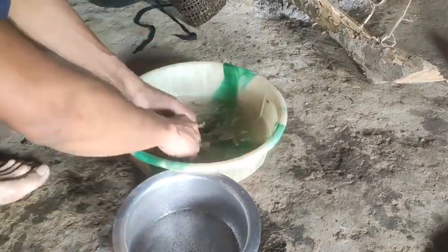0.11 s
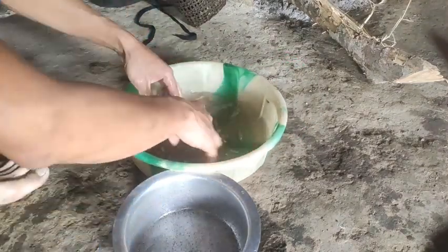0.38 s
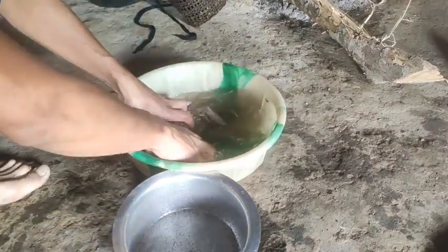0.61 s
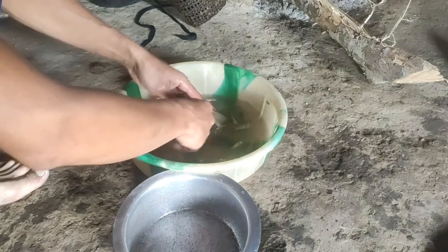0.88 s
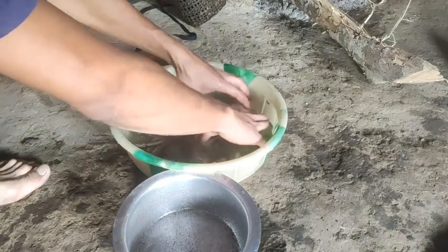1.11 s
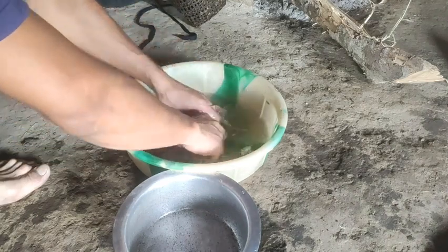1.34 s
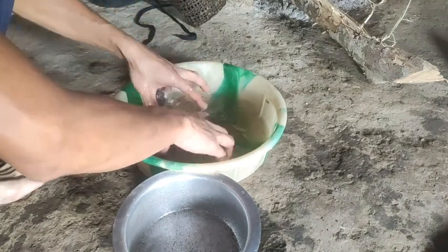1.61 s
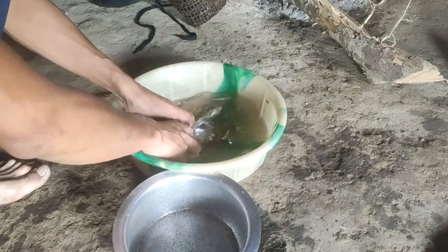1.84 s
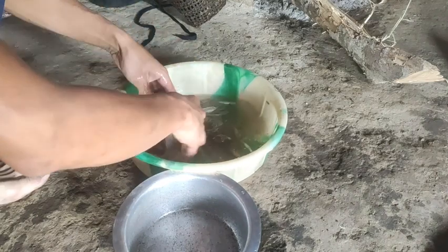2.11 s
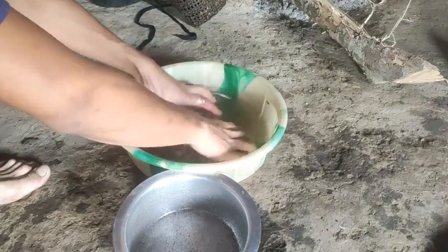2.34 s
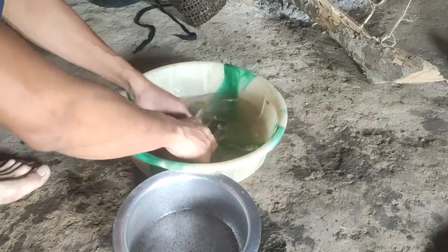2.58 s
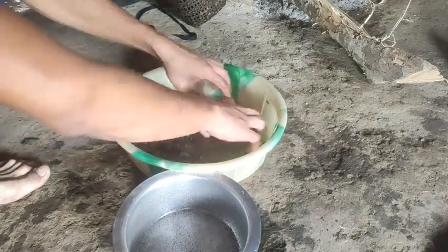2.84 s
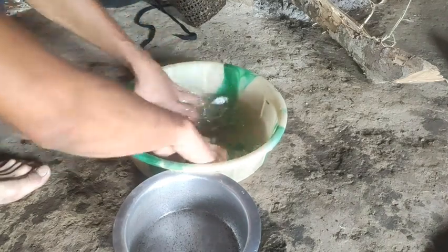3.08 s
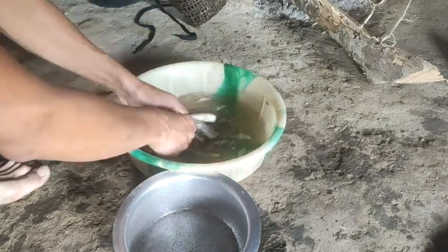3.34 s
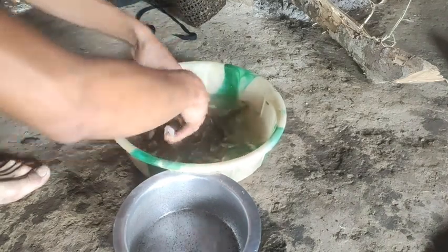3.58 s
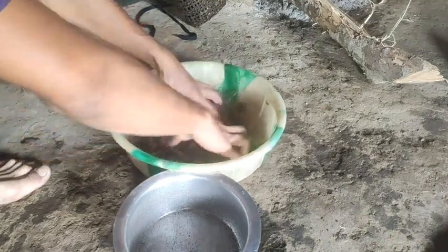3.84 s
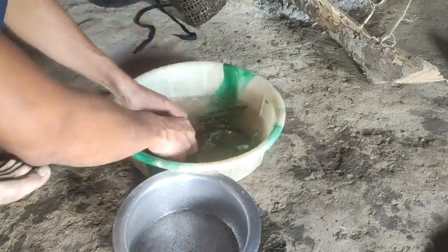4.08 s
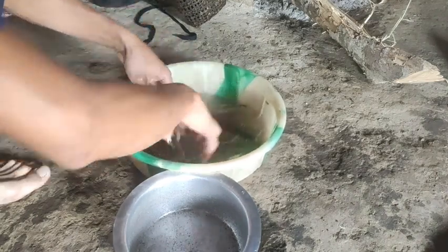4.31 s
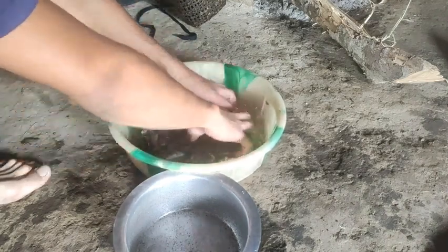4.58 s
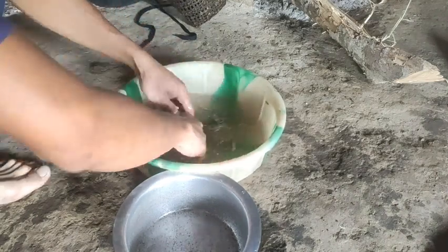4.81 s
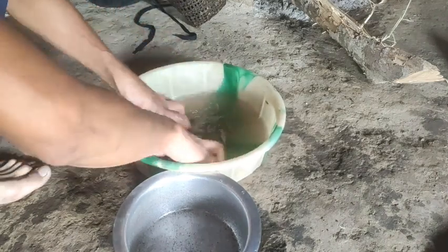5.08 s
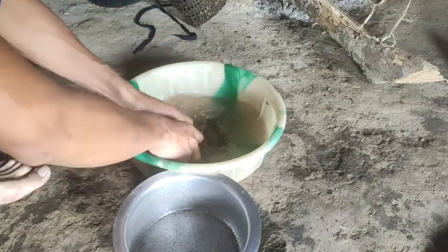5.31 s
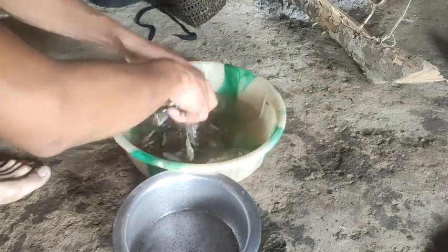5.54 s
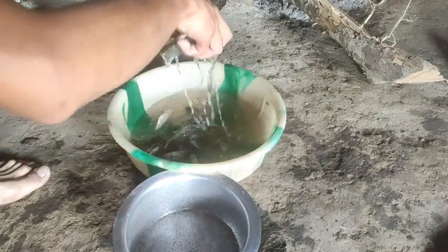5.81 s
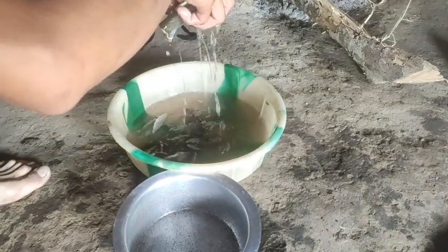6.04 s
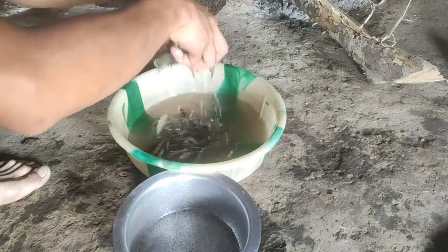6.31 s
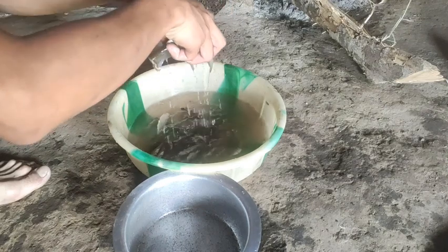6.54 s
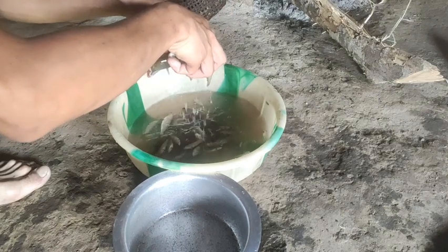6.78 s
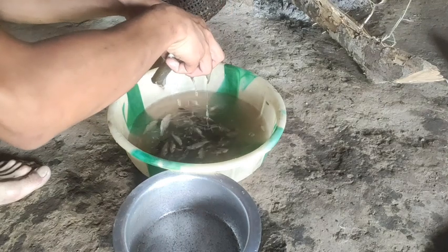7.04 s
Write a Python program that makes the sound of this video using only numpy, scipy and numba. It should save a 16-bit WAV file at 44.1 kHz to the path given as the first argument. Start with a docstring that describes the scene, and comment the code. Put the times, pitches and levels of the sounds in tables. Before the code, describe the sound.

Close watery swishing with bubbly gulps and bright spray in a plastic basin, ending in lighter droplets as a wet handful is raised outdoors.

```python
"""On a concrete yard, hands slosh small fish round a plastic basin of water, then lift them out to drip.
Trapped air gulps, plops and sings as fading sines; broken surface sprays as many tiny rings and noise.
The basin wall rings through resonant filters and thumps as low noise; reflections add a short tail.
The yard lies below as faint low rumble and hiss, made of noise bands.
A two-port phone microphone listens from above."""
import sys
import numpy as np
from scipy import signal
from scipy.io import wavfile
from scipy.ndimage import map_coordinates
from numba import njit

SR = 44100
rng = np.random.default_rng(int(sys.argv[2]) if len(sys.argv) > 2 else 0)


def to_linear_factor(level_db):
    """Convert decibel levels (scalar or array-like) to linear amplitude factors."""
    exponent = np.asarray(level_db, float) / 20
    return 10 ** exponent


def file_out(sig):
    """Save sig as 16-bit WAV at sys.argv[1]."""
    # one column per channel
    cols = np.atleast_2d(sig).T
    # limit, then scale
    lim = np.clip(cols, -1, 1)
    pcm = np.round(lim * 32767).astype(np.int16)
    wavfile.write(sys.argv[1], SR, pcm)


N = 315756   # length in samples
LEFT_LAG_S = 4.5e-5   # usual delay at the left port


def rms_one(x):
    """Scales a sound to an average strength (rms) of 1."""
    return x / np.sqrt(np.mean(x ** 2) + 1e-20)


def in_time(rows):
    """Turns each column after the time column into a curve with one value per sample."""
    s, *columns = np.transpose(rows)
    return [np.interp(np.arange(N) / SR, s, column) for column in columns]


def at_hz(points, hz):
    """Reads a curve over frequency, on a log frequency axis."""
    points_hz, values = np.transpose(points)
    return np.interp(np.log(hz), np.log(points_hz), values)


def drift(rate_hz):
    """Slow random wandering with rms 1, worked out at every 40th sample and filled in between."""
    r = np.exp(-80 * np.pi * rate_hz / SR)
    noise = rng.standard_normal(N // 40 + 2002)
    slow = signal.lfilter([1], [1, -2 * r, r * r], noise)[2000:]   # skip the filter's start
    return np.interp(np.arange(N) / 40, np.arange(len(slow)), rms_one(slow))


def spurts(rate_hz, fade_s):
    """Random jumps that come at once and die away, scaled to rms 1 and then capped at 2.5."""
    jumps = rng.exponential(1, N) * (rng.random(N) < rate_hz / SR)
    r = np.exp(-1 / (fade_s * SR))
    x = signal.lfilter([1], [1, -r], jumps + 1e-18)
    return np.minimum(rms_one(x - x.mean()), 2.5)


def band(x, low_hz, high_hz):
    """Keeps one frequency band, with its upper edge held to a safe limit."""
    edges = [low_hz, min(high_hz, .45 * SR)]
    return signal.sosfilt(signal.butter(2, edges, "band", fs=SR, output="sos"), x)


@njit
def add_rings(out, start, gains, hz, t60, rise, attack):
    """Each bubble is a dying sine; a positive rise makes its pitch climb as it nears the surface."""
    for k in range(len(hz)):
        for side in range(2):
            first = int(start[side, k]) + 1
            for i in range(first, min(first + int(.7 * t60[k] * SR), out.shape[1])):
                t = (i - start[side, k]) / SR
                turn = hz[k] * t * (1 + rise[k] * t / t60[k])
                fade = np.exp(-np.log(1000) * t / t60[k])   # 60 dB down at t60
                swell = min(t * hz[k] / attack, 1)   # attack is in cycles
                out[side, i] += gains[side, k] * fade * swell * np.sin(2 * np.pi * turn)


def bubbles(s, level_db, hz, t60, pan_db, rise, lag_s, attack):
    """Places bubbles between the two ports: pan_db is left over right, lag_s the delay at the left."""
    out = np.zeros((2, N))
    t60, pan_db, rise, lag_s = [x + 0 * s for x in (t60, pan_db, rise, lag_s)]   # one value per bubble
    start = np.array([s + lag_s / 2, s - lag_s / 2]) * SR
    gains = to_linear_factor(level_db + np.array([pan_db / 2, -pan_db / 2]))
    add_rings(out, np.maximum(start, 0), gains, hz, t60, rise, attack)
    return out


def yard():
    """Narrow bands of stereo noise, each wandering in level, alike at the ports mainly in the bass."""
    # Relative strength of the yard noise: f/Hz, level/dB
    yard_spectrum = [(15, -29), (25, 4), (76, -6), (127, 2), (190, -16), (290, 2.5), (365, -35), (520, -9),
                     (1330, -23), (8300, -20), (11500, -19.5), (14800, -21), (16000, 10)]
    # How alike the ports hear it: f/Hz, likeness (1 = the same, 0 = unrelated)
    port_likeness = [(60, 0.45), (130, 0.98), (300, 0.83), (640, 0), (15000, 0.0091)]
    out, edges = 0, 22 * 2 ** np.arange(0, 9.7, .4)
    white = rng.standard_normal((2, 2, N))
    for k, (low, high) in enumerate(zip(edges, edges[1:])):
        mid, side = band(white[k % 2], low, high)
        hz = np.sqrt(low * high)
        alike = np.clip(at_hz(port_likeness, hz), 0, 1)
        gain = to_linear_factor(at_hz(yard_spectrum, hz) + 3.5 * drift(3.9))
        stereo = np.sqrt(1 + alike) * mid + np.sqrt(1 - alike) * side * [[1], [-1]]
        out = out + gain * stereo
    level_db, left_db = -61, 0.9   # left_db: left over right
    return to_linear_factor(level_db + left_db * np.array([[.5], [-.5]])) * rms_one(out)


def stirring():
    """Gurgle and spray levels in dB: each slosh swells, holds and fades on top of the lapping."""
    # Sloshes of the hands, then of water falling back from the lifted fish, before layer trims:
    # t/s at full level, hold/s, gurgle level/dB, spray level/dB
    slosh_table = [(0.0, 0.062, -52.5, -54.5), (0.105, 0.17, -51.5, -53), (0.515, 0.02, -57, -47),
                   (0.615, 0.092, -53, -52.5), (0.731, 0.079, -49, -46), (1.014, 0.062, -58, -52.5),
                   (1.097, 0.046, -52, -41.5), (1.191, 0.025, -47, -52), (1.248, 0.032, -50.5, -48),
                   (1.328, 0.092, -50, -44.5), (1.625, 0.029, -53.5, -47), (1.754, 0.055, -55.5, -50),
                   (1.85, 0.11, -49, -48.5), (1.97, 0.076, -58, -53), (2.177, 0.04, -52, -50),
                   (2.295, 0.012, -60.5, -44.5), (2.479, 0.072, -48.5, -49.5), (2.589, 0.054, -54, -51),
                   (2.693, 0.029, -53.5, -44), (2.823, 0.018, -55.5, -51.5), (2.878, 0.024, -79, -48),
                   (2.96, 0.0074, -53, -53.5), (3.063, 0.12, -48.5, -49.5), (3.201, 0.17, -56, -51.5),
                   (3.466, 0.033, -57.5, -54.5), (3.583, 0.022, -77, -48), (3.681, 0.089, -54.5, -44),
                   (3.802, 0.039, -50, -58), (3.913, 0.085, -51, -52.5), (3.986, 0.081, -53.5, -55.5),
                   (4.134, 0.028, -56, -54), (4.21, 0.042, -49, -50.5), (4.4, 0.067, -58.5, -46),
                   (4.551, 0.23, -49.5, -50), (4.881, 0.017, -58.5, -52.5), (4.991, 0.061, -60, -53),
                   (5.109, 0.18, -48, -51), (5.386, 0.01, -50.5, -56.5), (5.767, 0.0075, -55.5, -72),
                   (5.807, 0.042, -68, -50.5), (5.89, 0.047, -58, -56.5), (5.976, 0.011, -54, -51),
                   (6.077, 0.11, -55.5, -56.5), (6.213, 0.064, -54, -49.5), (6.395, 0.036, -54, -50),
                   (6.653, 0.0097, -59, -56)]
    # Lapping that goes on between the sloshes, before layer trims: t/s, gurgle level/dB, spray level/dB
    lapping_table = [(0.0, -68, -56.5), (0.45, -62, -55), (0.95, -65, -60.5), (1.5, -61, -54),
                     (2.13, -64.5, -58.5), (2.8, -60, -59.5), (3.5, -61, -60.5), (4.3, -65.5, -61.5),
                     (5.05, -63, -61), (5.5, -61.5, -61), (5.63, -74.5, -60.5), (6.5, -73.5, -59.5),
                     (6.72, -76, -67.5), (7.16, -83, -79)]
    # Sloshes that start with a slap: t/s
    slap_times = (1.099, 2.485, 2.178, 2.698, 3.682, 4.553, 5.109)
    lift_s = 5.6   # once the fish are lifted, water lands more abruptly
    swell_db_per_s, fall_swell_db_per_s, slap_swell_db_per_s = 412, 898, 4000
    fades_db_per_s = (344, 274)   # gurgle, spray

    start, hold, *peaks_db = np.transpose(slosh_table)[:, :, None]
    t = np.arange(0, N + 64, 64) / SR
    early = np.maximum(start - t, 0)
    late = np.maximum(t - start - hold, 0)
    swell = np.where(start < lift_s, swell_db_per_s, fall_swell_db_per_s)
    sudden = np.abs(start - np.array(slap_times)).min(axis=1, keepdims=True) < .008
    swell = np.where(sudden, slap_swell_db_per_s, swell)
    levels = []
    for peak_db, fade, calm_db in zip(peaks_db, fades_db_per_s, in_time(lapping_table)):
        power = np.sum(to_linear_factor(peak_db - swell * early - fade * late) ** 2, axis=0)
        power = np.interp(np.arange(N) / SR, t, power)
        levels.append(10 * np.log10(power + to_linear_factor(calm_db) ** 2))
    return levels


def swarm(count, spectrum, level_db, cycles, uneven_db, clump_db, patch_db, spread_s, rise):
    """Many chance bubbles all over the surface, in clumps (clump_db) that favour some sizes (patch_db)."""
    when, pitch, size, place, climb, life = rng.random((count, 6)).T
    low, high = np.log(spectrum[1][0]), np.log(spectrum[-2][0])   # the end rows lie outside the range
    hz = np.exp(low + pitch * (high - low))
    at = (when * (N - 1)).astype(int)
    by_size = np.array([drift(35)[at] for size_class in range(5)])
    patches = map_coordinates(by_size, [4 * pitch, np.arange(count)], order=1)
    clumps = clump_db * spurts(rate_hz=45, fade_s=0.0041)[at] + patch_db * patches
    # 10 log10(hz) makes up for the shorter ring of high bubbles; uneven_db lets a few stand out.
    size_db = at_hz(spectrum, hz) + 10 * np.log10(hz) + clumps - uneven_db * np.log(size + 0.084)
    t60 = cycles * 2 ** (1.93 * (life - .4)) / hz
    pan_db = 2.44 + 5 * (place - .5)
    lag_s = LEFT_LAG_S + spread_s * (place - .5)
    out = bubbles(when * N / SR, size_db, hz, t60, pan_db, rise * climb, lag_s, attack=0.42)
    return to_linear_factor(level_db) * rms_one(out)


def gurgle(gurgle_db):
    """Trapped air gulps as a clumpy swarm of mostly low, climbing bubbles."""
    # Relative bubble strength by pitch: f/Hz, level/dB
    gurgle_spectrum = [(300, -30), (430, -16), (620, -8), (900, -6.5), (1300, 0.5), (2200, -0.5),
                       (3400, -9), (4000, -30)]
    return swarm(count=9000, spectrum=gurgle_spectrum, level_db=gurgle_db, cycles=26, uneven_db=2.4,
                 clump_db=1.6, patch_db=2.0, spread_s=0.00036, rise=0.6)


def plinks(gurgle_db, spray_db):
    """Lone bubbles, fewer and evenly scattered, ring for more cycles."""
    # Relative bubble strength by pitch: f/Hz, level/dB
    plink_spectrum = [(500, -30), (700, -5), (1400, 0), (3200, -4), (8000, -12), (9000, -40)]
    return swarm(count=1000, spectrum=plink_spectrum, level_db=(gurgle_db + spray_db) / 2 - 5,
                 cycles=43.6, uneven_db=3.5, clump_db=0, patch_db=0, spread_s=.0003, rise=.35)


def fizz(spray_db):
    """Broken surface sprays and fizzes as a dense swarm of tiny high rings."""
    # Relative fizz strength by pitch: f/Hz, level/dB
    fizz_spectrum = [(1470, -30), (2500, -14), (3360, -11.5), (5440, -12), (8330, -8.5), (12000, -15),
                     (15200, -10), (16000, -26)]
    return swarm(count=90000, spectrum=fizz_spectrum, level_db=spray_db + 1.5, cycles=34, uneven_db=1.4,
                 clump_db=1.34, patch_db=3.0, spread_s=0.00049, rise=0.061)


def wall_push(push_db):
    """Heaving water thumps dully on the wall: lumpy low noise, mostly shared by both ports."""
    lumps = to_linear_factor(5.5 * drift(45))
    noise = rng.standard_normal(N) + 0.18 * rng.standard_normal((2, N))
    return to_linear_factor(push_db) * rms_one(band(noise * lumps, 59, 430))


def basin(water):
    """The plastic wall rings in sympathy with the water: one resonant filter per way it can ring."""
    # Ways the wall rings: f/Hz, gain/dB, ring time to fall 60 dB/s
    wall_modes = [(617.6, 3, 0.076), (1014, 0, 0.23)]
    out = np.zeros((2, N))
    for hz, gain_db, t60 in wall_modes:
        r = to_linear_factor(-60 / (t60 * SR))
        w = 2 * np.pi * hz / SR
        push = [(1 - r * r) / 2, 0, (r * r - 1) / 2]
        out += to_linear_factor(gain_db) * signal.lfilter(push, [1, -2 * r * np.cos(w), r * r], water)
    return out


def reflections(x, t60):
    """Bowl, arms and ground scatter a short tail of fading noise, different at each port."""
    t = np.arange(1500) / SR
    tail = rng.standard_normal((2, len(t))) * to_linear_factor(-60 * t / t60) * (t > .0004)
    tail = band(tail, 1350, 7800)
    tail = tail / np.sqrt(np.sum(tail ** 2, axis=1, keepdims=True))
    return signal.fftconvolve(x, tail, axes=1)[:, :N]


def splashes():
    """A sheet of water tears: spray swells round its centre, then dies; one droplet rings out of it."""
    # Splashes, level before the trims below: t/s, level/dB, centre f/Hz, time to fall 60 dB/s
    splash_table = [(0.0945, -32.5, 4430, 0.02), (0.223, -25.5, 6960, 0.025), (0.505, -25, 7300, 0.012),
                    (0.5462, -28, 7950, 0.016), (1.02, -31.5, 8750, 0.027), (1.056, -31.5, 5800, 0.018),
                    (1.125, -20, 8000, 0.015), (1.128, -19.5, 9500, 0.012), (1.1492, -19.5, 7500, 0.021),
                    (1.171, -27, 8260, 0.023), (1.392, -23, 6400, .01), (1.71, -29, 6400, 0.023),
                    (1.749, -26.5, 6760, .014), (2.0155, -27, 5400, 0.053), (2.176, -32, 5700, .012),
                    (2.264, -30.5, 3980, 0.0087), (2.299, -24.5, 5900, 0.082), (2.368, -31, 5530, 0.011),
                    (2.4577, -27, 8550, 0.018), (2.9608, -28.5, 5050, 0.014), (3.032, -27, 8300, 0.0094),
                    (3.598, -27.5, 7240, 0.0082), (3.759, -28, 7200, 0.12), (4.242, -26, 3800, 0.015),
                    (4.521, -33, 7800, 0.0099), (4.611, -19.5, 7000, 0.013), (4.7368, -18.5, 7400, 0.0062),
                    (5.0533, -31.5, 7300, 0.007), (5.1097, -33, 3600, 0.069), (5.2416, -26, 3960, 0.014),
                    (5.273, -29.5, 5670, 0.014), (5.7758, -36, 6300, .008), (5.8203, -30.5, 3930, 0.021),
                    (5.844, -26, 11100, .01), (5.885, -32, 10500, .008), (6.056, -31, 6500, 0.012),
                    (6.062, -34, 13500, 0.19), (6.081, -31, 6100, 0.012), (6.1489, -31.5, 5550, 0.016),
                    (6.1712, -29, 7350, 0.019), (6.184, -29.5, 6760, 0.019), (6.2173, -24.5, 3800, 0.034),
                    (6.215, -23, 11000, .008), (6.239, -25, 10000, .01), (6.284, -26, 7400, 0.0099),
                    (6.333, -25, 4800, 0.0046), (6.4163, -26, 4200, 0.007), (6.419, -25, 10900, .01),
                    (6.4936, -38, 8180, 0.011), (6.561, -38, 7200, 0.016), (6.5889, -40, 8500, .012),
                    (6.609, -36, 9000, 0.013), (6.6502, -33, 4620, 0.03), (6.651, -26, 11500, 0.02),
                    (6.7635, -41, 9000, .012), (6.8334, -44, 7000, .012), (6.852, -38, 6100, .012),
                    (6.8654, -35, 12500, .01), (7.087, -39, 8900, 0.014), (7.1197, -40, 14000, .01)]
    s, level_db, hz, t60 = np.transpose(splash_table)
    swell_s = 0.001414
    pan_db = 9.5 * (hz < 9700)   # the finest spray is equally loud at both ports
    out = bubbles(s + swell_s, level_db - 7, hz, 36 / hz, pan_db, .1, LEFT_LAG_S, attack=4)
    t = np.arange(2000) / SR
    for start, db, centre, length, pan in zip(s, level_db, hz, t60, pan_db):
        i = int(start * SR)
        shared, own = rng.standard_normal(len(t)), rng.standard_normal((2, len(t)))
        shape = np.where(t < swell_s, t / swell_s, to_linear_factor(-60 * (t - swell_s) / length))
        burst = rms_one(band(0.21 * shared + own, centre / 1.3, centre * 1.45)) * shape
        burst = burst * to_linear_factor(db - 11.5 + np.array([[pan / 2], [-pan / 2]]))
        out[:, i:i + len(t)] += burst[:, :N - i]
    return out


def plops():
    """A big air pocket rings with a slight climb; it breaks with a slap and sheds smaller pockets."""
    # Plops of trapped air, level before the trims below: t/s, level/dB, f/Hz
    plop_table = [(0.18, -40, 1060), (0.222, -36.5, 1050), (0.254, -34.5, 1900), (0.368, -42, 1730),
                  (0.499, -37, 1370), (0.716, -36, 1050), (0.783, -32, 1060), (0.891, -38, 2360),
                  (1.037, -34.5, 1790), (1.09, -36, 1470), (1.2023, -33, 1710), (1.41, -39, 1330),
                  (1.466, -39, 1200), (1.532, -28.5, 2720), (1.597, -40, 1280), (1.627, -38, 1620),
                  (1.787, -31, 850), (1.838, -34, 1130), (1.852, -22, 1340), (1.884, -32, 2780),
                  (1.9, -31.5, 1010), (2.022, -33, 2190), (2.178, -24.5, 1560), (2.184, -34, 624),
                  (2.204, -37, 3400), (2.509, -38, 670), (2.521, -38, 1400), (2.564, -34, 1220),
                  (2.7, -37, 2630), (2.718, -34, 2260), (2.734, -37, 1215), (2.794, -41, 880),
                  (2.835, -36, 1780), (2.875, -37, 1830), (2.961, -26, 703), (3.078, -32, 2080),
                  (3.096, -33, 1190), (3.157, -31, 1055), (3.287, -32, 1020), (3.449, -36.5, 1730),
                  (3.724, -33.5, 2500), (3.943, -27.5, 990), (3.991, -33, 2200), (4.23, -31.5, 725),
                  (4.436, -32, 1550), (4.49, -37.5, 1200), (4.553, -32.5, 1460), (4.555, -30, 658),
                  (4.828, -34.5, 3170), (4.972, -36.5, 3070), (5.11, -36, 1110), (5.279, -27.5, 2240),
                  (5.693, -37, 660), (5.983, -27.5, 1128), (5.988, -32.5, 593), (6.219, -26.5, 1800),
                  (6.286, -41, 1820), (6.356, -39, 1110), (6.397, -34.5, 1000), (6.654, -38, 3120),
                  (6.765, -48.5, 3420)]
    s, level_db, hz = np.transpose(plop_table)
    pan_db = 1.9 + 12.0 * (rng.random(len(s)) - .5)
    t60 = .012 + 16 / hz   # a fixed part in seconds plus 16 cycles
    out = bubbles(s, level_db - 3.5, hz, t60, pan_db, 0.12, LEFT_LAG_S, attack=1.1)
    out += bubbles(s, level_db - 9.0, 2.1 * hz, 5.0 / hz, pan_db, 0, LEFT_LAG_S, attack=.2)   # slap
    # Seven shed pockets per plop, spread round its pitch and softer the later they come.
    for late, detune, size in rng.random((len(s), 3, 7)).transpose(2, 1, 0):
        shed_s = s + .75 * t60 * late
        shed_db = level_db - 4.5 - 9 * size - 10 * late
        shed_hz = hz * 2 ** (0.87 * (detune - .25))
        shed_pan_db = pan_db + 12 * (size - .5)
        out += bubbles(shed_s, shed_db, shed_hz, 16 / shed_hz, shed_pan_db, .3 * size, LEFT_LAG_S, attack=.3)
    return out


def singers():
    """A lone round bubble rings long and clean, climbing a little."""
    # Clear bubbles that sing on: t/s, level/dB, f/Hz, time to fall 60 dB/s
    singer_table = [(0.254, -43.5, 474, 0.092), (0.646, -45.5, 638, 0.084), (0.961, -51, 1670, 0.089),
                    (2.603, -41.5, 2320, 0.088), (4.041, -40.5, 1283, 0.13), (5.277, -39, 1590, 0.058),
                    (5.295, -45.5, 770, 0.092), (5.402, -47, 2100, 0.061), (5.472, -49, 1270, 0.062),
                    (6.544, -49.5, 1315, 0.069)]
    s, level_db, hz, t60 = np.transpose(singer_table)
    return bubbles(s, level_db, hz, t60, 1.6, 0.049, LEFT_LAG_S, attack=0.66)


def bumps():
    """Hands bump the basin under water: a short low push through the wall, each at its own pitch."""
    # Bumps: t/s, level/dB
    bump_table = [(0.745, -42), (1.766, -44), (2.94, -44), (4.231, -41.5), (4.559, -41.5), (5.11, -40.5)]
    s, level_db = np.transpose(bump_table)
    hz = 97 * 2 ** (0.54 * (rng.random(len(s)) - .5))
    return bubbles(s, level_db, hz, 0.056, 1, 0, 0, attack=0.32)


def snap():
    """Flat slaps and a sharp flick break the surface, each as a few very short rings."""
    # Rings, level before swell and fade:
    # t/s, level/dB, f/Hz, time to fall 60 dB/s, left over right/dB, swell/cycles
    snap_table = [(3.6815, 4, 6100, .0018, 14, 3.2), (3.6812, -3, 11000, .0013, 7, 3.5),
                  (3.6813, -9, 14800, .0011, 5, 3.5), (1.2093, -21, 1200, .018, 0, .6),
                  (1.2093, -21, 2500, .004, 1.5, .4), (1.2093, -20, 4000, .003, 2.5, .6),
                  (1.2116, -26, 3200, .008, 1.5, .4), (1.111, -20, 2500, .007, 2, .8)]
    out = np.zeros((2, N))
    for row in snap_table:
        s, level_db, hz, t60, pan_db = np.array([row[:5]]).T
        out += bubbles(s, level_db, hz, t60, pan_db, 0, LEFT_LAG_S, attack=row[5])
    return out


def scene():
    """Adds up water, basin, reflections and yard."""
    gurgle_db, spray_db = stirring()
    water = gurgle(gurgle_db) + plinks(gurgle_db, spray_db) + fizz(spray_db)
    water = water + splashes() + plops() + singers() + snap()
    wall = basin(water) + bumps() + wall_push(gurgle_db - 13.0)
    echo = to_linear_factor(-15) * reflections(water, t60=.022)
    return water + wall + echo + yard()


def low_pass(x):
    """Removes everything above the highest recorded frequency."""
    return signal.sosfilt(signal.butter(12, 16490, fs=SR, output="sos"), x)


def record(dry):
    """A steep low-pass leaves little above about 16 kHz."""
    low_passed = signal.sosfilt(signal.cheby2(10, 50, 16500, fs=SR, output="sos"), dry)
    return low_pass(low_passed)


dry = scene()
out = record(dry)
file_out(out)
```